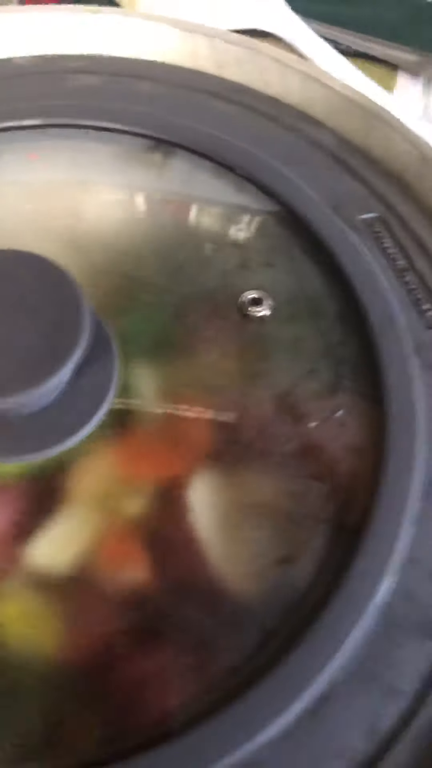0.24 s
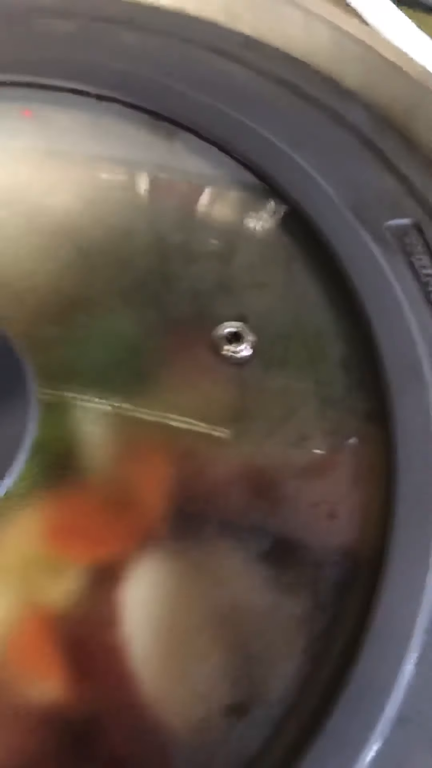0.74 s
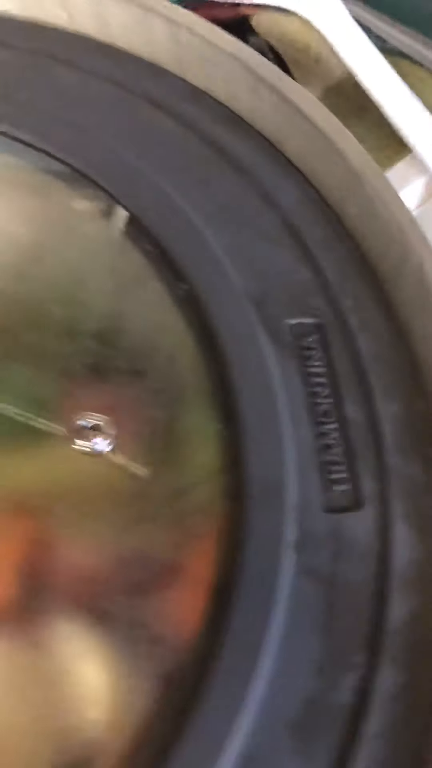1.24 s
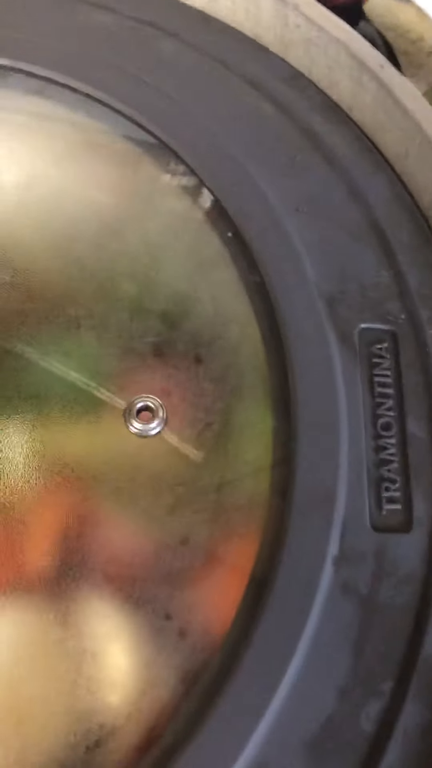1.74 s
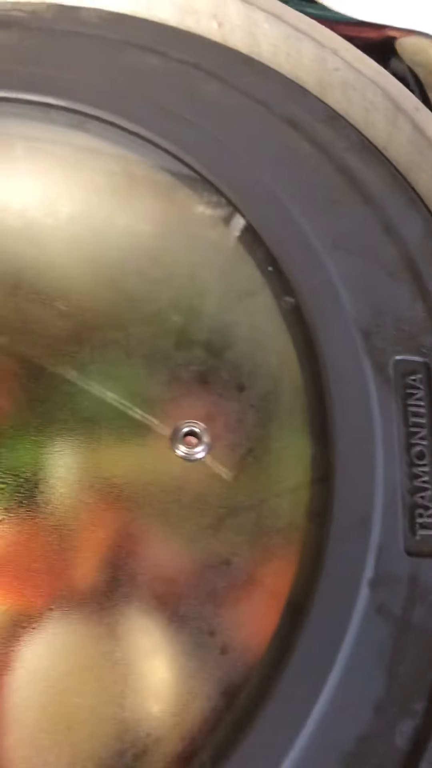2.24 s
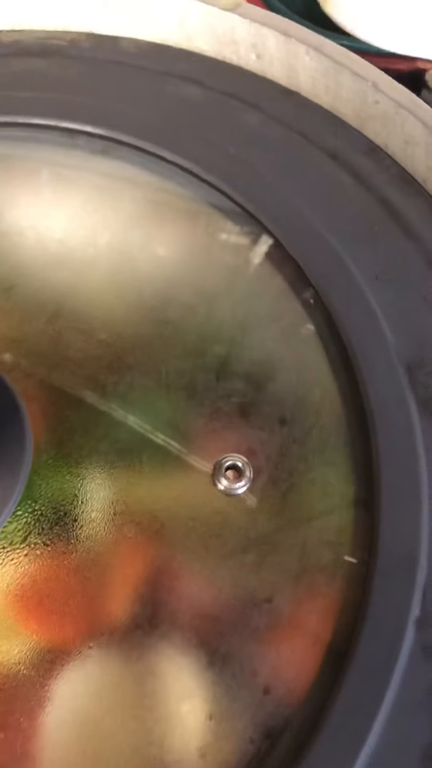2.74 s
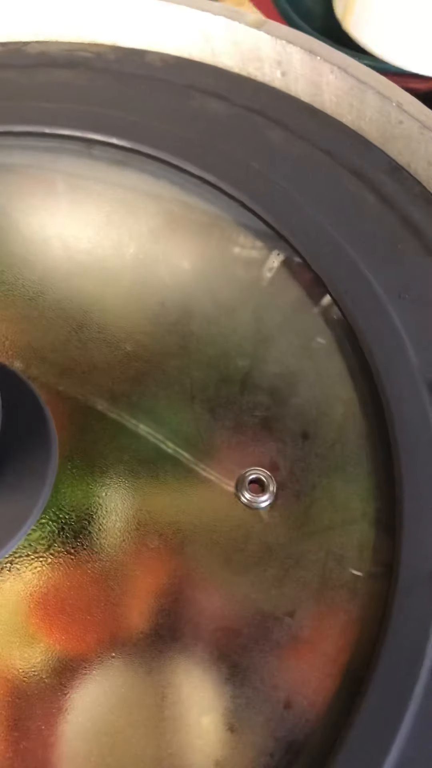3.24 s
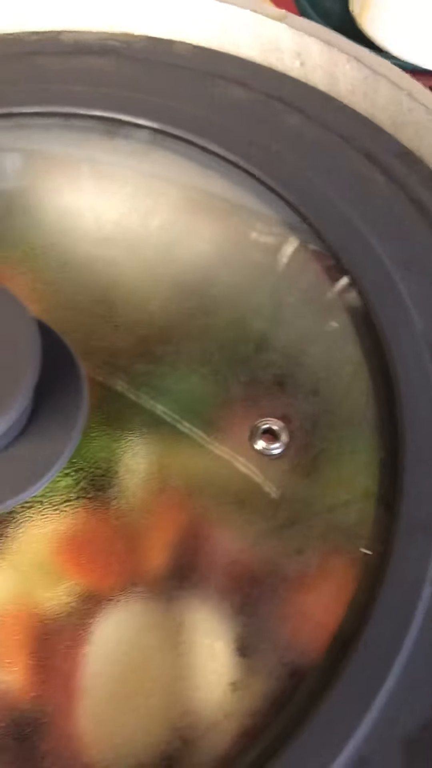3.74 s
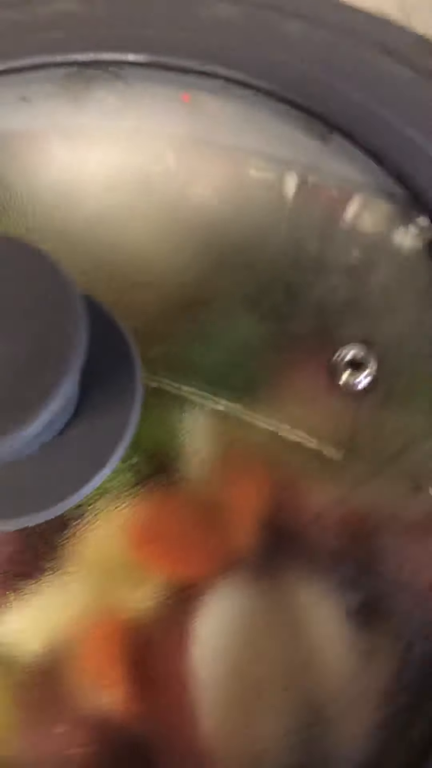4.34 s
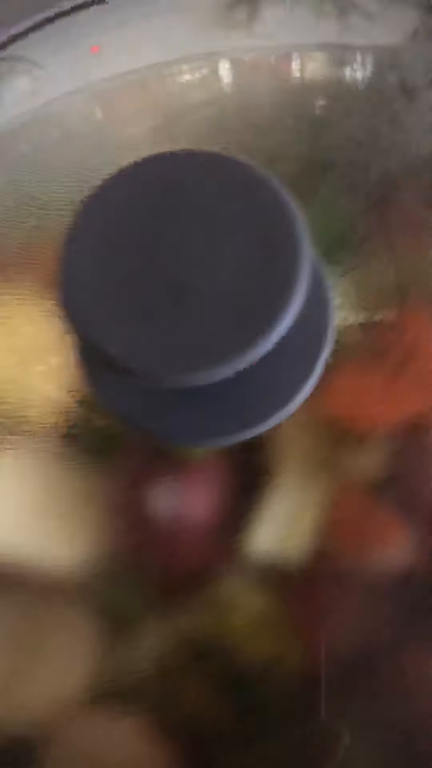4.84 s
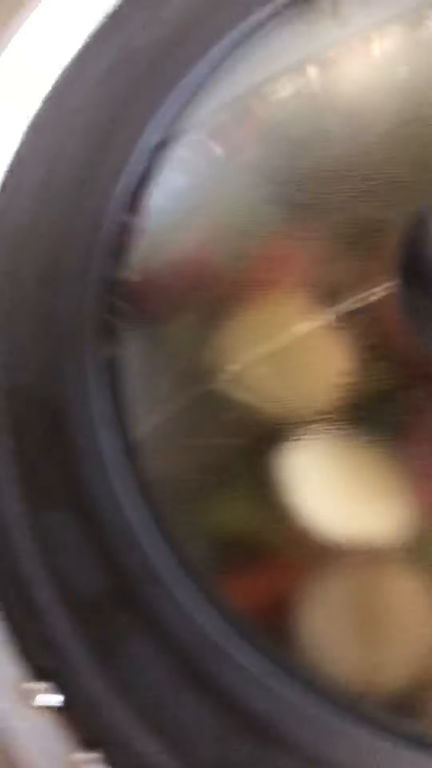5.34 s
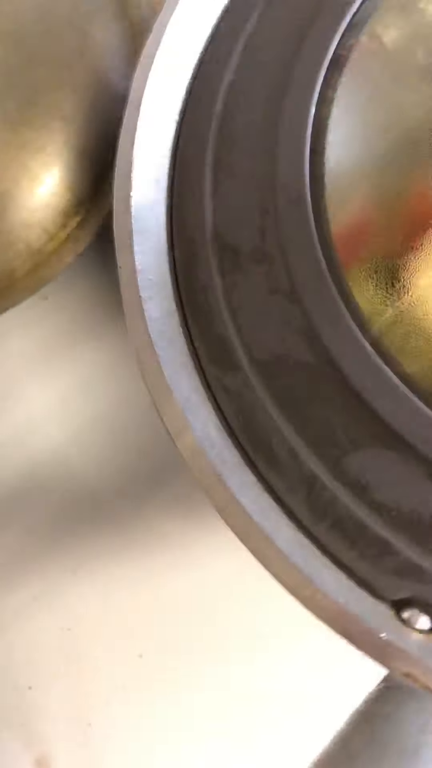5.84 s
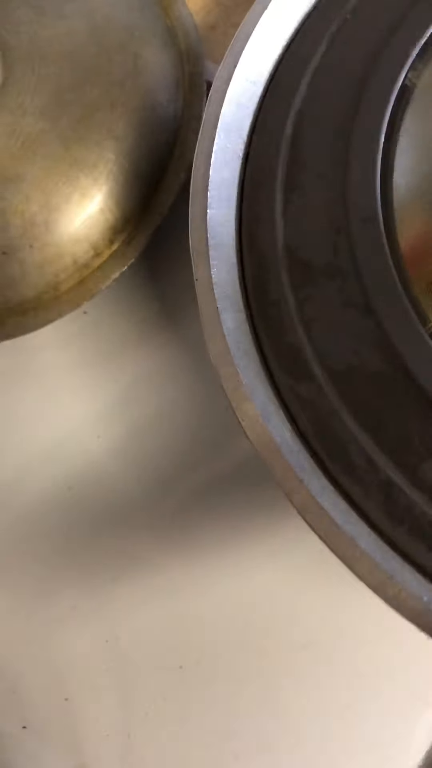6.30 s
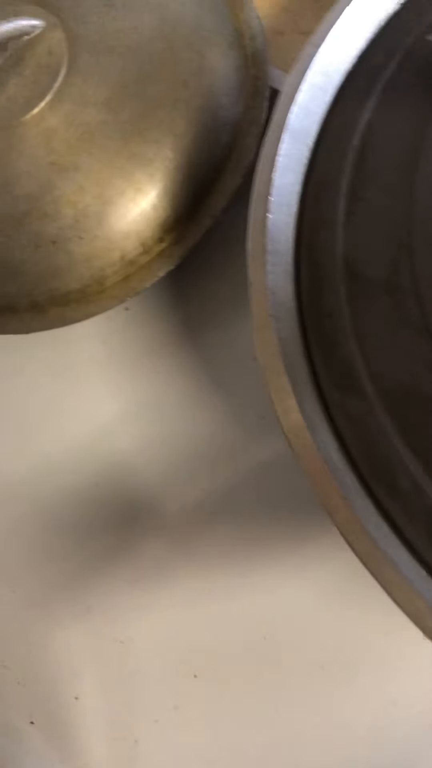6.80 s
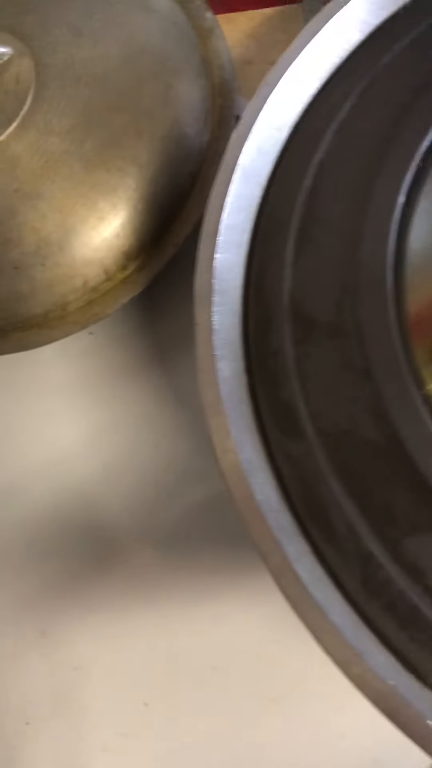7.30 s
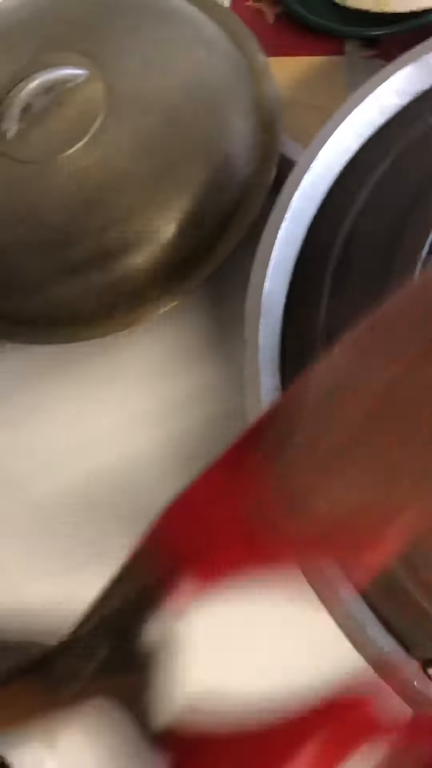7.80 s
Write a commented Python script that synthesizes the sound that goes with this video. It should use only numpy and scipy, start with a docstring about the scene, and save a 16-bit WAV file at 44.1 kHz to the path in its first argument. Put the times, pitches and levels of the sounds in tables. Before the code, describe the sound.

A constant fine frying hiss, hollow and slightly resonant under a glass lid, heard very close with little room echo. Early on come a small steam puff, muffled bubble plops with low thumps, and faint taps. A sudden hard double clack rings the pot midway. Several crisp fat ticks follow; the listening point slides to the pot's side, the sizzle becoming airier, and a passing hand finally shades it.

```python
"""In a small kitchen a stew sizzles in a pot under a glass lid, heard from close above, then from beside the pot.
Random steam bursts, coloured by air resonances and near echoes, make the sizzle; filtered noise makes
the stove's rumble and a spurt of steam. Damped rings and dull noise make thick bubbles' plops, spitting
fat and light taps on the pot. Half way through, something hard clacks against the pot: noise and damped
modes. Everything reaches one microphone; the plops, taps, fat and clack carry a short tail from the walls."""
import sys
import numpy as np
from scipy import signal
from scipy.fft import rfft, irfft, next_fast_len
from scipy.io import wavfile

SR = 44100
rng = np.random.default_rng(int(sys.argv[2]) if len(sys.argv) > 2 else 0)


def file_out(sig):
    """Save sig as 16-bit WAV at sys.argv[1]."""
    # one column per channel
    cols = np.atleast_2d(sig).T
    # limit, then scale
    lim = np.clip(cols, -1, 1)
    pcm = np.round(lim * 32767).astype(np.int16)
    wavfile.write(sys.argv[1], SR, pcm)


N = 355446
TIME = np.arange(N) / SR  # s


def from_db(db):
    """Logarithmic level: 20 dB is a factor of ten in amplitude."""
    return 10 ** (np.asarray(db) / 20)


def rms_one(x):
    """Normalisation: equal mean power, so that levels can be set in dB."""
    return x / np.sqrt(np.mean(x ** 2) + 1e-20)


def coloured(x, points):
    """Spectral shaping: a gain drawn over log frequency weights the spectrum; rms 1."""
    hz, db = np.transpose(points)
    size = next_fast_len(N)
    bins = np.maximum(np.fft.rfftfreq(size, 1 / SR), 1)
    gain = from_db(np.interp(np.log(bins), np.log(hz), db))
    return rms_one(irfft(rfft(x, size) * gain, size)[:N])


def band_of(x, hz, width_hz):
    """Resonance: a cavity passes a narrow band around its natural frequency."""
    b, a = signal.iirpeak(hz, hz / width_hz, fs=SR)
    return signal.lfilter(b, a, x)


def resonant(x, resonances):
    """Superposed resonances: each air mode lifts (or slightly lowers) its band; rms 1."""
    out = x
    for hz, width_hz, lift_db in resonances:
        out = out + (from_db(lift_db) - 1) * band_of(x, hz, width_hz)
    return rms_one(out)


def add(out, s, sound):
    """Superposition: mix a short sound in at time s."""
    at = int(s * SR)
    out[at:at + len(sound)] += sound[:N - at]


def dying(t60, rise_s):
    """Exponential decay: times, and an envelope that rises quickly and falls 60 dB per t60."""
    t = TIME[:int((t60 + 2 * rise_s) * SR) + 2]
    return t, (1 - np.exp(-t / rise_s)) * from_db(-60 * t / t60)


def ring(hz, t60, rise_s):
    """Damped free vibration of a single mode."""
    t, envelope = dying(t60, rise_s)
    return envelope * np.sin(2 * np.pi * hz * t)


def thud(hz, t60, dull):
    """Soft impact: a rise within about a cycle; power is shared between a ring and noise around its pitch."""
    t, envelope = dying(t60, rise_s=.5 / hz)
    band = signal.butter(3, [hz * .5, hz * 1.59], "band", fs=SR, output="sos")
    noise = rms_one(signal.sosfilt(band, rng.standard_normal(SR // 2)))
    noise = noise[-len(t):] / np.sqrt(2)  # same power as the sine
    dull = np.clip(dull, 0, 1)
    return envelope * (np.sqrt(dull) * noise + np.sqrt(1 - dull) * np.sin(2 * np.pi * hz * t))


def swell(s, length_s):
    """Gaussian pulse: a smooth rise from 0 to 1 and back around time s."""
    return np.exp(-((TIME - s) / length_s) ** 2)


def wander(rate_hz):
    """Random modulation: straight lines between random knots; rms 1."""
    knots = rng.standard_normal(400)
    return rms_one(np.interp(TIME, np.arange(len(knots)) / rate_hz, knots))


# the microphone draws back from over the lid to the side of the pot: middle and length of the move
MOVE_S, MOVE_LENGTH_S = 5.43, 0.75


def moved(over, beside, s=MOVE_S, length_s=MOVE_LENGTH_S):
    """Change of receiver position: a value glides linearly from over the lid to beside the pot."""
    progress = np.clip((TIME - s) / length_s + .5, 0, 1)
    return over + (beside - over) * progress


KITCHEN_T60_S = 0.3


def kitchen(x, wet_db):
    """Reverberation: the direct sound convolved with a short, dull, decaying noise tail from the walls."""
    t, envelope = dying(KITCHEN_T60_S, rise_s=0.0037)
    tail = signal.lfilter(*signal.butter(1, 5000, fs=SR), envelope * rng.standard_normal(len(t)))
    return x + from_db(wet_db) * signal.fftconvolve(x, tail / np.linalg.norm(tail))[:N]


RUMBLE_OVER_DB, RUMBLE_BESIDE_DB = -46, -49
HUM_HZ, HUM_DB = 59, -66
# relative spectrum of the stove and the simmer: (f/Hz, level/dB)
RUMBLE_COLOUR = [(20, -50), (35, -32), (48, -18), (62, 0), (80, -27), (110, -2), (140, 0.5), (220, -3),
                 (300, -3.5), (400, -12), (600, -15.5), (1200, -22.5)]


def rumble():
    """Broadband low-frequency noise: stove and simmering mass murmur over a faint pure motor hum."""
    hum = from_db(HUM_DB) * rms_one(np.sin(2 * np.pi * HUM_HZ * TIME))
    murmur = coloured(rng.standard_normal(N), RUMBLE_COLOUR)
    return hum + from_db(moved(RUMBLE_OVER_DB, RUMBLE_BESIDE_DB)) * murmur


# light taps on the pot: (t/s, level/dB)
TAPS = [(1.93, -33.5), (2.384, -30), (3.537, -35), (3.705, -36.5)]
# what a tap rings with, relative to the tap: (f/Hz, level/dB, t60/s, dull share/0-1)
TAP_MODES = [(935, 0.5, .085, 0.1), (450, -2, .05, 0.5)]


def taps():
    """Modal excitation: every light tap sounds the same two short modes."""
    out = np.zeros(N)
    for s, db in TAPS:
        for hz, mode_db, t60, dull in TAP_MODES:
            add(out, s, from_db(db + mode_db) * thud(hz, t60, dull))
    return kitchen(out, wet_db=-9.5)


# ticks of spitting fat: (t/s, f/Hz, level/dB)
TICKS = [(1.2203, 4600, -11), (3.393, 2000, -21), (4.547, 4100, -18), (4.683, 3200, -20),
         (4.777, 4000, -17), (4.893, 3600, -14), (6.54, 5000, -18), (7.505, 5500, -20)]


def ticks():
    """Impulsive radiation: a droplet of fat bursts with a snap of a few cycles."""
    out = np.zeros(N)
    for s, hz, db in TICKS:
        add(out, s, from_db(db) * ring(hz, t60=9 / hz, rise_s=.00004))
    return kitchen(out, wet_db=-5.5)


# contacts of the clack and the decay of their rattle: (t/s, level/dB, t60/s)
CONTACTS = [(3.8623, -5.5, 0.04), (3.8653, -21, 0.03), (3.8773, -11, 0.21)]
# modes of the struck pot, relative to the contact: (f/Hz, level/dB, t60/s)
POT_MODES = [(312, -10, .035), (390, -31, .1), (500, -32, .13), (623, -28, 0.12), (655, -20, .09),
             (970, -25, 0.25), (1000, -17, 0.21), (1058, -16, 0.13), (1157, -36, 0.15), (1320, -22, .17),
             (1400, -30, 0.18), (1980, -23, .14), (2130, -20, 0.2), (2300, -19, .12), (2780, -33, 0.14)]
# relative spectrum of the rattle: (f/Hz, level/dB)
RATTLE_COLOUR = [(100, -17), (250, -14), (450, 2), (650, 4.5), (820, -6), (1050, 5), (1300, -1.5),
                 (1700, -3.5), (2400, -4), (4500, -11.5), (7000, -14), (10000, -19.5), (15000, -43)]
# relative spectrum of the stove top's shudder: (f/Hz, level/dB)
SHUDDER_COLOUR = [(20, -25), (40, -9), (58, 2), (80, -10), (100, 1), (128, 6), (170, -10), (300, -17.5),
                  (1000, -43)]
SHUDDER_DB, SHUDDER_T60_S = -26.5, 0.61


def clack():
    """Impact and modal decay: two sharp touches and a rattling settle ring the pot; the stove top shudders on."""
    out = np.zeros(N)
    grit = coloured(rng.standard_normal(N), RATTLE_COLOUR)
    for s, db, t60 in CONTACTS:
        t, envelope = dying(t60, rise_s=0.00043)
        add(out, s, from_db(db) * envelope * grit[int(s * SR):][:len(t)])
        for hz, mode_db, mode_t60 in POT_MODES:
            polarity = rng.choice([-1, 1])
            add(out, s, from_db(db + mode_db) * polarity * ring(hz, mode_t60, rise_s=0.66 / hz))
    t, envelope = dying(SHUDDER_T60_S, rise_s=0.0025)
    shudder = coloured(rng.standard_normal(N), SHUDDER_COLOUR)[:len(t)]
    last_contact_s = CONTACTS[-1][0]
    add(out, last_contact_s, from_db(SHUDDER_DB) * envelope * shudder)
    return kitchen(out, wet_db=-20.0)


PLOP_DULL = 0.75  # share 0-1 of noise in a plop's power
# the stew slumps back after each plop
THUMP_DELAY_S, THUMP_HZ, THUMP_T60_S, THUMP_DULL = 0.01895, 124, .15, 0.46
# thick bubbles, and at 3.392 s a short dull click, each followed by the low thump: (t/s, f/Hz, level/dB, t60/s,
# thump level/dB)
PLOPS = [(0.467, 400, -42, 0.065, -32.5), (.534, 564, -33, .08, -47), (.853, 400, -42, .06, -34),
         (.967, 448, -28.5, 0.054, -31), (1.44, 470, -35.5, 0.075, -31), (1.613, 407, -33.5, 0.096, -35),
         (1.737, 523, -20.5, .022, -39), (2.116, 400, -39, 0.065, -42), (2.238, 333, -22.5, .06, -28),
         (2.308, 380, -28, .11, -29), (3.392, 1200, -25.5, .012, -41), (3.53, 382, -31.5, .07, -38),
         (4.995, 480, -30, 0.052, -39), (5.402, 205, -33, 0.11, -46), (5.451, 164, -33, .09, -37)]


def plops():
    """Damped bubble oscillation: each bubble plops (one row is a short dull click instead), and a moment later
    the stew slumps back with a low thump."""
    out = np.zeros(N)
    for s, hz, db, t60, thump_db in PLOPS:
        add(out, s, from_db(db) * thud(hz, t60, PLOP_DULL))
        add(out, s + THUMP_DELAY_S, from_db(thump_db) * thud(THUMP_HZ, THUMP_T60_S, THUMP_DULL))
    return kitchen(out, wet_db=-7.0)


SPURT_S, SPURT_LENGTH_S, SPURT_DB = 0.514, 0.048, -35  # length: centre to 1/e
# resonances a spurt of steam sounds at the lid: (f/Hz, width/Hz, relative level/dB)
SPURT_AIR = [(800, 38, 6), (1440, 120, -3), (1490, 55, 9), (2000, 120, -2), (3460, 180, 1.5)]


def spurt():
    """Jet noise through resonances: a puff of steam swells and fades, sounding the air under the lid."""
    jet = rng.standard_normal(N)
    voiced = sum(from_db(db) * band_of(jet, hz, width_hz) for hz, width_hz, db in SPURT_AIR)
    return from_db(SPURT_DB) * swell(SPURT_S, SPURT_LENGTH_S) * rms_one(voiced)


def bursts(per_s, spread_db, hiss_db):
    """Random pulse train: tiny steam bursts, most weak, a few strong, over the hiss of those too small to tell apart."""
    sizes = from_db(spread_db * np.minimum(rng.exponential(1, N), 4)) * rng.choice([-1, 1], N)
    born = rng.random(N) < per_s / SR
    clicks = rms_one(sizes * born)
    for hz in (3000, 6000, 9000, 12000):
        b, a = signal.iirpeak(hz, hz / 1500, fs=SR)
        clicks = signal.lfilter(a[::-1], a, clicks)  # all-pass: each click is drawn out into a few cycles
    return clicks + from_db(hiss_db) * rng.standard_normal(N)


def patchy(x, patchy_db, rate_hz, count=16):
    """Independent band modulation: frying spots of different pitch flare and fade, each on its own."""
    edges = np.append(0, np.geomspace(1000, SR / 2, count))  # Hz
    size = next_fast_len(N)
    spectrum, hz = rfft(x, size), np.fft.rfftfreq(size, 1 / SR)
    out = np.zeros(N)
    for low, high in zip(edges, edges[1:]):
        band = irfft(spectrum * ((hz >= low) & (hz < high)), size)[:N]
        out += band * from_db(patchy_db * wander(rate_hz))
    return out


def reflected(x, echo_db, lag_s, sway, count=3):
    """Comb interference: rim, lid and stove top return echoes; paths sway with the hand-held microphone."""
    out = x
    for k in range(1, count + 1):
        late_s = k * lag_s * (1 + sway * wander(rate_hz=1.5))
        out = out + from_db(echo_db) * np.interp(TIME - late_s, TIME, x)
    return out / np.sqrt(1 + count * from_db(echo_db) ** 2)


# levels over the lid and beside the pot
BODY_OVER_DB, BODY_BESIDE_DB = -38.5, -43
FIZZ_OVER_DB, FIZZ_BESIDE_DB = -40, -36.5
# power share 0-1 of the body heard through the lid; it changes as the microphone crosses the pot's edge
LID_SHARE_OVER, LID_SHARE_BESIDE = 0.97, 0.04
EDGE_S, EDGE_LENGTH_S = 5.69, 0.58
# swells, each with its length from centre to 1/e
# for a while the body is weaker and less of it comes through the lid
RIM_S, RIM_LENGTH_S, RIM_SHARE, RIM_BODY_DB = 1.76, 1, 0.18, -1.5
# the microphone leans in close to the lid
LEAN_S, LEAN_LENGTH_S, LEAN_BODY_DB, LEAN_FIZZ_DB = 4.81, 0.45, 1.5, 2.5
# a hand passes in front of it and shades the sizzle
HAND_S, HAND_LENGTH_S, HAND_BODY_DB, HAND_FIZZ_DB = 7.92, 0.16, -2.2, -10
# relative spectra of the body over the lid, beside the pot, and of the finest fizz: (f/Hz, level/dB)
LID_COLOUR = [(300, -28), (600, -17.5), (1100, -12), (1700, -6), (2600, -4.5), (4000, 0.5), (5200, -3),
              (7500, -4), (10000, -7), (12000, -17.5), (16000, -14.5)]
SIDE_COLOUR = [(300, -24.5), (600, -18), (1100, -6.5), (2000, -7), (3000, -1), (4300, -0.5), (7000, 0),
               (10000, -7.5), (16000, -7)]
FIZZ_COLOUR = [(4000, -33), (7500, -5), (10000, -.5), (12200, -1.2), (14500, 0), (16000, -0.5)]
# air resonances of the pot from those two places: (f/Hz, width/Hz, lift/dB)
LID_AIR = [(805, 50, 18), (1300, 99, 4), (1501, 71, 13), (1670, 34, 4.5), (1998, 164, 7), (2924, 135, 5),
           (3350, 110, -0.5), (3500, 89, -2), (3990, 250, 2), (5700, 530, 3.5), (8970, 470, 4)]
SIDE_AIR = [(453, 30, 21.4), (797, 50, 16.6), (1256, 46, 11.4), (1755, 74, 10.1), (2270, 74, 7.5),
            (2640, 43, 6.1), (3314, 57, 7.3), (4500, 100, 2.8)]


def sizzle():
    """Source and transmission path: one frying, coloured differently over the lid and beside; fine bursts fizz on top."""
    rim = swell(RIM_S, RIM_LENGTH_S)
    lean = swell(LEAN_S, LEAN_LENGTH_S)
    hand = swell(HAND_S, HAND_LENGTH_S)
    body_db = moved(BODY_OVER_DB, BODY_BESIDE_DB)
    body_db = body_db + RIM_BODY_DB * rim + LEAN_BODY_DB * lean + HAND_BODY_DB * hand
    fizz_db = moved(FIZZ_OVER_DB, FIZZ_BESIDE_DB) + LEAN_FIZZ_DB * lean + HAND_FIZZ_DB * hand
    lid_share = moved(LID_SHARE_OVER, LID_SHARE_BESIDE, EDGE_S, EDGE_LENGTH_S)
    over = np.clip(lid_share - RIM_SHARE * rim, 0, 1)

    frying = patchy(bursts(per_s=4500, spread_db=3.0, hiss_db=-0.5), patchy_db=0.88, rate_hz=14)
    under_lid = reflected(frying, echo_db=-18.5, lag_s=.00197, sway=0.036)
    above = from_db(1.34) * resonant(coloured(under_lid, LID_COLOUR), LID_AIR)
    beside = from_db(3.0) * resonant(coloured(frying, SIDE_COLOUR), SIDE_AIR)
    body = np.sqrt(over) * above + np.sqrt(1 - over) * beside  # shares of power

    fine = patchy(bursts(per_s=5000, spread_db=4.3, hiss_db=3.0), patchy_db=1.23, rate_hz=26)
    fizz = coloured(reflected(fine, echo_db=-13.0, lag_s=.0013, sway=.03), FIZZ_COLOUR)
    return from_db(body_db) * body + from_db(fizz_db) * fizz


def scene():
    """Linear superposition: all sources add at one microphone, alike in both channels."""
    mono = rumble() + taps() + ticks() + clack() + plops() + spurt() + sizzle()
    return np.array([mono, mono])


CUTOFF_HZ = 15950


def record(dry):
    """Band limiting and clipping: the deepest bass is lost, peaks stop at 0.92 and then the top is cut."""
    thin = signal.sosfilt(signal.butter(4, 38, "high", fs=SR, output="sos"), dry)
    top_cut = signal.firwin(601, CUTOFF_HZ, window="blackman", fs=SR)
    return signal.fftconvolve(np.clip(thin, -.92, .92), top_cut[None], mode="same")


dry = scene()
out = record(dry)
file_out(out)
```